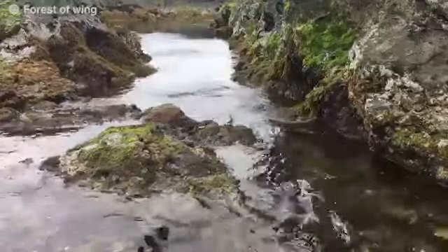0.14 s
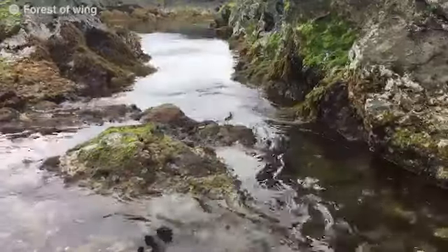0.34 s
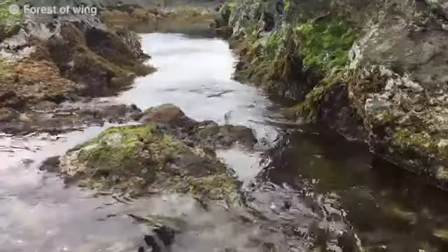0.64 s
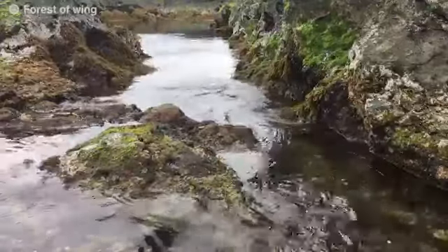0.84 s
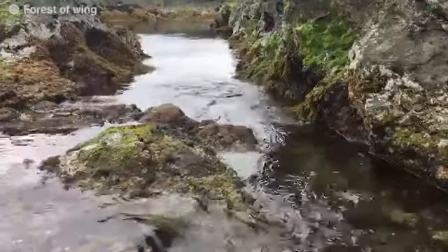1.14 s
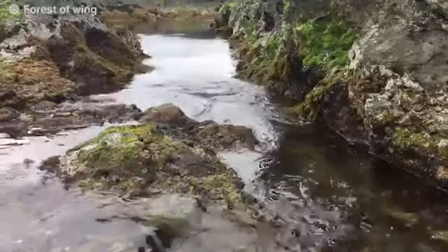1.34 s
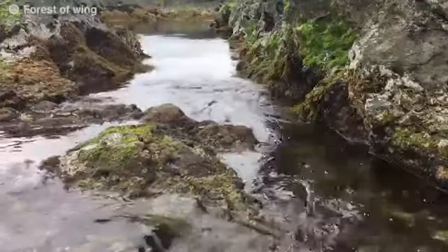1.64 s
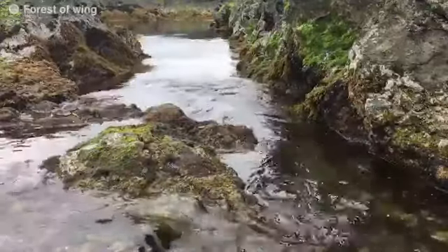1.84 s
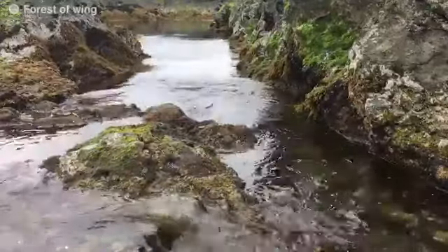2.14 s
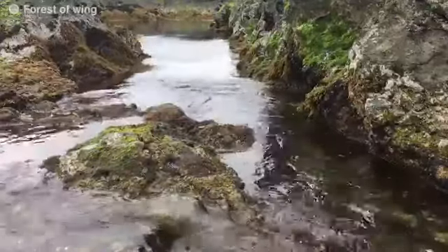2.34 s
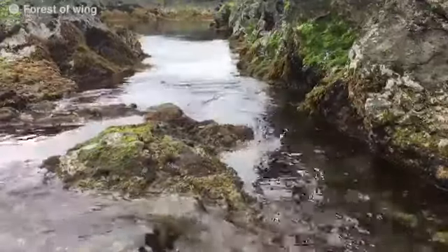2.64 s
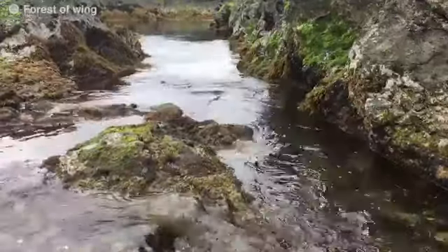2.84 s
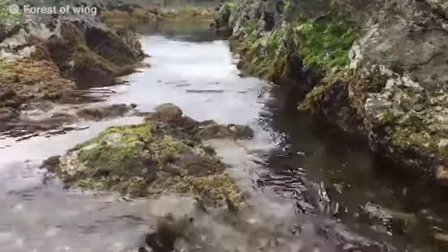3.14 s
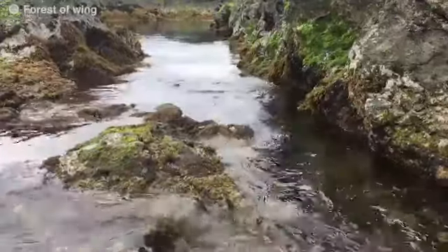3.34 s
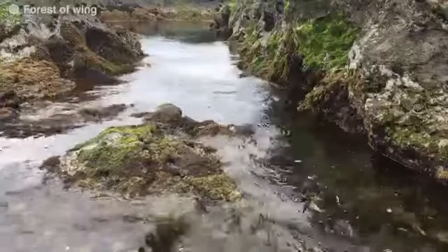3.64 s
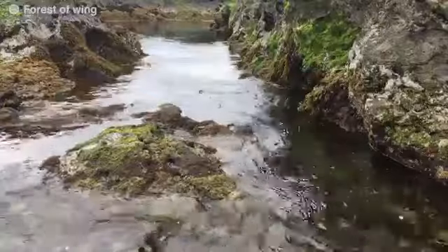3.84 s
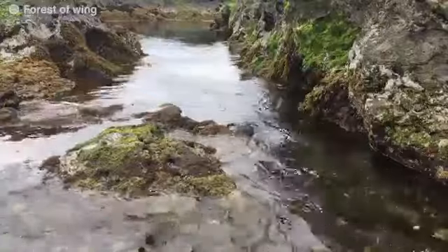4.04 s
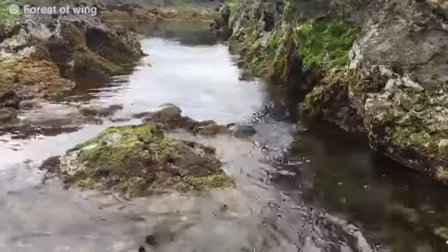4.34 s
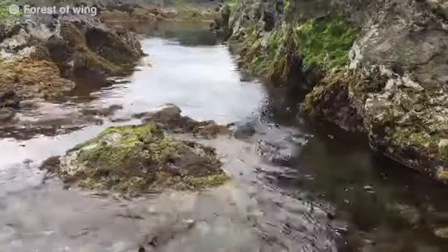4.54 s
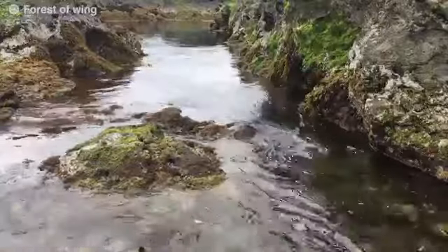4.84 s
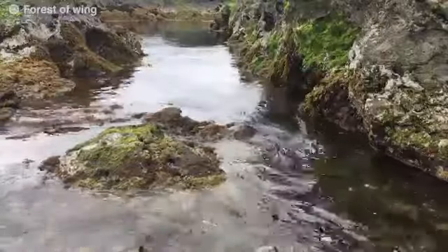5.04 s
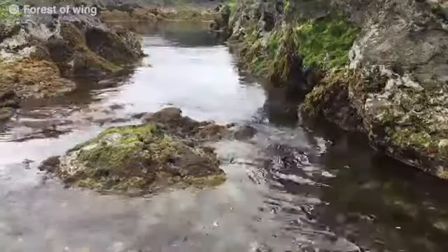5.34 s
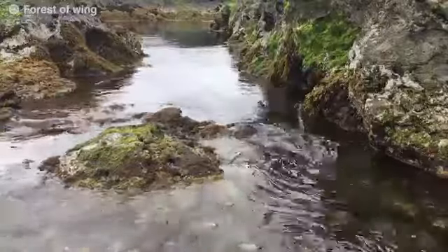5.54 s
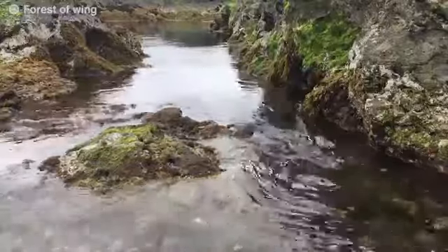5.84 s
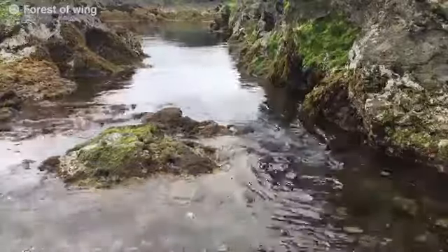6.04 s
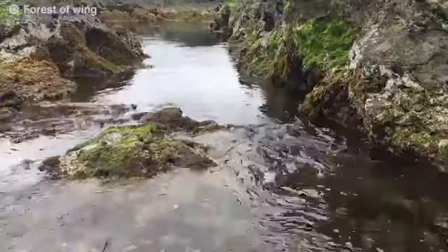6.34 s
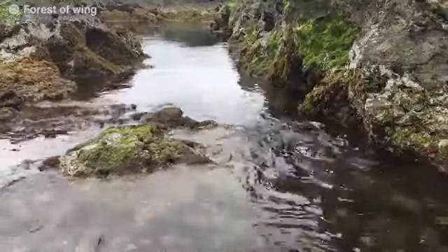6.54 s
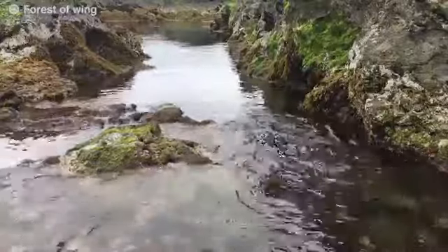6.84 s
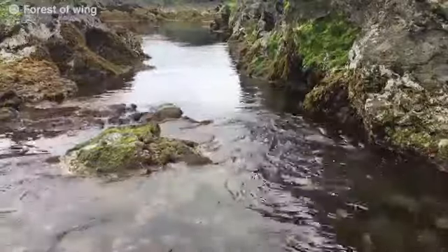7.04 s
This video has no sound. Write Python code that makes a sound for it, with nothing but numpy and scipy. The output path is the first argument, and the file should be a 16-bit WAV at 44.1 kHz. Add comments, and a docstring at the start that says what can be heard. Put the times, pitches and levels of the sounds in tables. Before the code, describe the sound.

A low swell bubbles close by between shore rocks, foam ticking and hissing, wind buffeting the microphone, then draining glugs fade to calm.

```python
"""Swell in a rocky gap

A low swell pushes seawater through a gap between shore rocks, close to the microphone.
Trapped air rings as decaying sines that gurgle, foam bursts in tiny resonant ticks, shaped noise
washes and hisses, and the rock walls throw the bubbles and foam back.
Gusts of low-passed noise and swings of pressure buffet the microphone twice; two engines, probably
on boats, drone far off as wavering harmonics over a dull rumble and the hiss of the open sea."""
import sys
import numpy as np
from scipy import signal
from scipy.fft import rfft, irfft, next_fast_len
from scipy.io import wavfile
from scipy.ndimage import uniform_filter1d

SR = 44100
rng = np.random.default_rng(int(sys.argv[2]) if len(sys.argv) > 2 else 0)


def inscribe(sig):
    """Save sig as 16-bit PCM at rate SR to the path in sys.argv[1].

    A 1-D sig is mono; a 2-D sig holds one channel per row.
    Samples are clipped to [-1, 1] before scaling.
    """
    pcm = np.round(np.clip(np.atleast_2d(sig).T, -1, 1) * 32767)
    wavfile.write(sys.argv[1], SR, pcm.astype(np.int16))


N = 317299  # samples
TIME = np.arange(N) / SR  # seconds


def from_db(db):
    """Logarithmic level: decibels to amplitude gain."""
    return 10 ** (np.asarray(db) / 20)


def rms_one(x):
    """Power normalization: scale to rms 1."""
    return x / np.sqrt(np.mean(x ** 2) + 1e-20)


def in_time(rows):
    """Linear interpolation: the columns of a curve table at every sample."""
    s, *columns = np.transpose(rows)
    return np.array([np.interp(TIME, s, column) for column in columns])


def at_hz(points, hz):
    """Logarithmic pitch: read a spectrum in dB on a log-frequency axis."""
    f, db = np.transpose(points)
    return np.interp(np.log(hz + 1e-9), np.log(f), db)


def envelope(start_s, attack_s, hold_s, release_s):
    """Amplitude envelope: rise, hold and fall between 0 and 1."""
    corners_s = start_s + np.cumsum([0, attack_s, hold_s, release_s])
    return np.interp(TIME, corners_s, [0, 1, 1, 0])


def drift(rate_hz):
    """Low-passed chance: a slow random curve with spread 1, from two equal poles at the given rate."""
    step, settle = 40, 2000  # samples per slow step; slow steps dropped while the filter settles
    r = np.exp(-2 * np.pi * rate_hz * step / SR)
    chance = rng.standard_normal(N // step + settle + 2)
    slow = signal.lfilter([1], [1, -2 * r, r * r], chance)[settle:]
    return np.interp(np.arange(N) / step, np.arange(len(slow)), rms_one(slow))


def noise(spectrum):
    """Spectral shaping: white noise weighted to a given colour, rms 1."""
    size = next_fast_len(N)
    hz = np.arange(size // 2 + 1) * SR / size
    white = rfft(rng.standard_normal(size))
    return rms_one(irfft(white * from_db(at_hz(spectrum, hz)), size)[:N])


def low_pass(order, hz):
    """Butterworth low-pass filter: maximally flat below its corner."""
    return signal.butter(order, hz, fs=SR, output="sos")


def high_pass(order, hz):
    """Butterworth high-pass filter: maximally flat above its corner."""
    return signal.butter(order, hz, "high", fs=SR, output="sos")


def resonate(x, hz, width_hz):
    """Damped resonance: a pole pair with gain 1 at its top."""
    r = np.exp(-np.pi * width_hz / SR)
    zeros = np.array([1, 0, -1]) * (1 - r * r) / 2
    poles = [1, -2 * r * np.cos(2 * np.pi * hz / SR), r * r]
    return signal.lfilter(zeros, poles, x + 1e-18)


def steady(x):
    """Running power normalization: hold the half-second rms of a grain stream at 1."""
    return x / np.sqrt(uniform_filter1d(x ** 2, SR // 2) + 1e-12)


def add(out, s, sound):
    """Superposition: mix a short sound in at time s."""
    start = int(np.clip(s * SR, 0, N))
    out[start:start + len(sound)] += sound[:N - start]


def bubble(hz, cycles, rise, swell_cycles=0.2):
    """Bubble resonance: a sine dies by 60 dB in so many cycles; pitch rises as it nears the surface."""
    turn = np.arange(int(cycles / hz * SR) + 2) * hz / SR
    age = turn / cycles
    swell = 1 - np.exp(-(turn / swell_cycles) ** 2)
    decay = np.exp(-np.log(1000) * age)
    return swell * decay * np.sin(2 * np.pi * turn * (1 + rise * age / 2))


def scatter(count, level_db, crowding):
    """Level-weighted chance: random moments in seconds that crowd together where the level is high."""
    due = np.cumsum(from_db(crowding * level_db))
    share = (np.arange(count) + rng.random(count)) / count
    return np.searchsorted(due, share * due[-1]) / SR


def engine(orders, cycle_hz, waver_db=2.0, speed_wander=0.00437):
    """Harmonics of the firing cycle; each wavers on its way through the moving air."""
    turn = 2 * np.pi * np.cumsum(cycle_hz * (1 + speed_wander * drift(0.84))) / SR
    out = np.zeros(N)
    for multiple, db in orders:
        gain = from_db(db + waver_db * drift(3.0))
        out += gain * np.sin(multiple * turn + rng.uniform(0, 2 * np.pi))
    return np.sqrt(2) * out


# Orders of the slow engine. Each row: multiple of the cycle rate, relative level in dB.
SLOW_ORDERS = [(3, -60), (4, -75), (5, -48.5), (6, -63), (9, -51), (10, -52), (11, -65), (12, -57.5),
               (13, -64.5)]
# Orders of the fast engine. Each row: multiple of the cycle rate, relative level in dB.
FAST_ORDERS = [(2, -52), (3, -61), (4, -62.5), (5, -74)]
SLOW_CYCLE_HZ, FAST_CYCLE_HZ = 12.82, 65.7
# The engines come through more strongly for a while, by a bell-shaped curve.
ENGINE_CREST_S, ENGINE_SWELL_S, ENGINE_CREST_DB = 5.1, 0.93, 6.5


def engines(level_db=-7.0):
    """Superposed harmonic series: two engines whose joint level swells to a crest and fades."""
    carry_db = ENGINE_CREST_DB * np.exp(-((TIME - ENGINE_CREST_S) / ENGINE_SWELL_S) ** 2)
    both = engine(SLOW_ORDERS, SLOW_CYCLE_HZ) + engine(FAST_ORDERS, FAST_CYCLE_HZ)
    return from_db(carry_db + level_db) * both


# Level of the low rumble, which swells with the breeze. Each row: time in seconds, level in dB.
RUMBLE_SWELL = [(0, -40.5), (.33, -43), (.42, -44), (1.2, -42.5), (2.0, -45.5), (2.15, -38), (2.5, -44.5),
                (2.65, -29.5), (2.8, -39.5), (3.2, -35.5), (3.55, -42), (4.1, -49.5), (5.1, -43.5),
                (6.15, -40), (6.5, -41.5), (6.75, -35), (7.0, -41), (7.19, -43)]
# Colour of the rumble. Each row: frequency in Hz, relative density in dB per Hz.
RUMBLE_SPECTRUM = [(20, 2), (40, -7), (70, 1.5), (100, -9), (150, -18), (220, -22.5), (320, -31.5),
                   (600, -41.5), (900, -47), (1600, -60.5)]


def rumble(swell_db=3.0, heave_hz=130):
    """Band-split modulation: dull noise whose deepest part heaves."""
    level_db, = in_time(RUMBLE_SWELL)
    even = noise(RUMBLE_SPECTRUM)
    deep = signal.sosfiltfilt(low_pass(2, heave_hz), even)
    heaving = from_db(swell_db * drift(2.3)) * deep
    return from_db(level_db) * (even - deep + heaving)


# Colour of the open sea. Each row: frequency in Hz, relative density in dB per Hz.
SEA_SPECTRUM = [(240, -10.5), (400, -2), (738, -11), (3160, -18), (4920, -26), (6000, -22.5),
                (14400, -18.5), (15500, -79)]


def open_sea(level_db=-71):
    """Stationary broadband noise: the steady hiss of the open sea."""
    return from_db(level_db) * noise(SEA_SPECTRUM)


# Puffs of wind on the microphone. Each row: start in seconds, length in seconds from the start to
# the fall, level in dB before its low-pass, corner of that low-pass in Hz.
WIND_PUFFS = [(2.084, 0.1, -42.5, 400), (2.228, 0.057, -42, 496), (2.316, 0.029, -36, 805),
              (2.423, 0.047, -40.5, 400), (2.589, 0.058, -36, 190), (2.667, 0.055, -37.5, 603),
              (2.816, 0.058, -36.5, 262), (2.891, 0.081, -33, 420), (3.132, 0.042, -33.5, 500),
              (3.214, 0.18, -36.5, 446), (6.722, 0.12, -40.5, 258), (7.113, 0.07, -33.5, 445)]
# Colour of the turbulence. Each row: frequency in Hz, relative density in dB per Hz.
WIND_SPECTRUM = [(30, 8), (80, -3.5), (160, 1), (300, -6.5), (750, -30), (1300, -58)]
GUST_ATTACK_S, GUST_RELEASE_S = 0.016, 0.011


def puffs(flutter_db=4.0):
    """Turbulent pressure fluctuation: fluttering noise in puffs, each with its own brightness."""
    turbulence = noise(WIND_SPECTRUM) * from_db(flutter_db * drift(58))
    out = np.zeros(N)
    for s, length_s, db, top_hz in WIND_PUFFS:
        shape = envelope(s, GUST_ATTACK_S, length_s - GUST_ATTACK_S, GUST_RELEASE_S)
        out += from_db(db) * shape * signal.sosfilt(low_pass(2, top_hz), turbulence)
    return out


# The sharpest eddies hitting the microphone. Each row: start in seconds, relative level in dB,
# time from the start to the crest of the envelope in seconds.
SHARP_EDDIES = [(2.113, -27.5, 0.014), (2.142, -34, 0.01), (2.249, -41, 0.0053), (2.33, -35, 0.0082),
                (2.689, -33.5, 0.0091), (2.826, -27, 0.011), (2.918, -31, 0.0062), (2.993, -38, 0.0079),
                (3.118, -19.5, 0.01), (3.158, -34, 0.0046), (3.232, -28, 0.0063), (3.265, -35, 0.0054),
                (3.289, -24, 0.0074), (3.296, -21, 0.00205), (3.789, -38, 0.0089), (6.81, -36, 0.0059),
                (7.153, -32.5, 0.0053), (7.172, -36, 0.0044)]


def eddies(level_db=2.5, top_hz=750, turns=1.064):
    """Vortex passage: a sharp eddy is a swing of pressure that slows as it passes."""
    out = np.zeros(N)
    for s, db, swing_s in SHARP_EDDIES:
        age = TIME[1:SR // 10] / swing_s
        shape = (age * np.exp(1 - age)) ** 2
        swing = np.sin(2 * np.pi * turns * np.log(age))  # log phase: the swing slows with age
        add(out, s, from_db(db + level_db) * shape * swing)
    return signal.sosfilt(low_pass(4, top_hz), out)


# Colour of the churning current. Each row: frequency in Hz, relative density in dB per Hz.
WASH_SPECTRUM = [(240, 6), (400, -7), (570, 6.5), (765, -13), (1420, -1.5), (1880, -10.5), (4500, -17.5),
                 (5850, -85)]
# Colour of the fine hiss. Each row: frequency in Hz, relative density in dB per Hz.
HISS_SPECTRUM = [(2350, -44), (4000, -32), (6020, -18), (7720, -12), (9200, -46), (12100, 29), (14400, 7),
                 (15500, 30)]


def wash(gurgle_db, fizz_db, churn_db=5.0, wash_db=-2.5, hiss_db=-3.0):
    """Amplitude-modulated noise: the current's wash and its hiss churn together."""
    current = from_db(gurgle_db + wash_db) * noise(WASH_SPECTRUM)
    hiss = from_db(fizz_db + hiss_db) * noise(HISS_SPECTRUM)
    return from_db(churn_db * drift(38)) * (current + hiss)


# Resonances of a hollow in the rock. Each row: frequency in Hz, nominal width in Hz, relative level in dB.
HOLLOW_MODES = [(348, 175, 4.5), (540, 130, -1), (880, 175, 3.5), (1400, 74, -5), (2050, 340, -2.5)]
DRAIN_START_S, DRAIN_RISE_S, DRAIN_HOLD_S, DRAIN_FALL_S = 3.6, 0.58, 1.4, 0.96


def drain(count, glug_db=-58.5, spread_db=2.0, cycles=22, rise=0.18, rush_db=-73.0):
    """Cavity resonance: backwash rushes through a hollow; trapped air burbles near its resonances."""
    draining = envelope(DRAIN_START_S, DRAIN_RISE_S, DRAIN_HOLD_S, DRAIN_FALL_S)
    draining_db = 20 * np.log10(draining + 1e-9)
    stream = rng.standard_normal(N)
    rush, glugs = np.zeros(N), np.zeros(N)
    for hz, width_hz, db in HOLLOW_MODES:
        mode = resonate(resonate(stream, hz, 2 * width_hz), hz, 2 * width_hz)
        rush += from_db(db) * rms_one(mode)
        moments = scatter(count, draining_db, crowding=0.98)
        for s, (size, detune) in zip(moments, rng.random((count, 2))):
            level_db = glug_db + db - spread_db * np.log(size + 0.13)
            glug_hz = hz + width_hz * (2 * detune - 1)
            add(glugs, s, from_db(level_db) * bubble(glug_hz, cycles, rise))
    return draining * (from_db(rush_db) * rms_one(rush) + glugs)


# Strength of foam ticks by pitch. Each row: frequency in Hz, relative level in dB.
FOAM_STRENGTH = [(3500, -20), (5000, 2.5), (7500, -2), (9500, 6.5), (12500, 3.5), (15000, 1)]


def foam(count, per_s=1100, spread_db=9.0, sharpness=3.6, clump_db=4.0):
    """Impulse excitation: tiny bubbles burst in clumps, each at one of many pitches."""
    born = rng.random(N) < per_s * from_db(clump_db * drift(14)) / SR
    strength = from_db(-spread_db * np.log(rng.random(N) + .03))
    clicks = born * strength * rng.choice([-1, 1], N)
    dealt = rng.integers(0, count, N)  # which pitch each click excites
    out = np.zeros(N)
    for k, hz in enumerate(np.geomspace(4000, 14800, count)):
        width_hz = hz / sharpness
        ring = resonate(resonate(clicks * (dealt == k), hz, width_hz), hz, width_hz)
        out += from_db(at_hz(FOAM_STRENGTH, hz)) * ring / np.sqrt(hz)
    return steady(rms_one(out))


# The loudest droplets. Each row: time in seconds, relative level in dB, pitch in Hz.
DROPLETS = [(0.973, -39, 8600), (1.2266, -35, 5600), (1.4057, -29.5, 10800), (1.9781, -51, 6400),
            (2.5817, -37, 8200), (2.6638, -27.5, 10900), (2.7794, -27.5, 14600), (3.3727, -29, 12820),
            (3.7334, -24.5, 12300), (3.8334, -32.5, 9000), (3.9997, -35, 13300), (4.2982, -35, 10000),
            (4.5416, -25.5, 13100), (4.7165, -33, 11400), (4.807, -34.5, 6700), (5.3324, -42, 10300),
            (5.8224, -36, 10200), (6.7138, -43, 13700)]


def ticks(cycles=14, level_db=4, ring_db=-16, ring_hz=5600, low_cut_hz=3500):
    """Small-source radiation: a water film snaps and its cavity rings, too small for low notes."""
    out = np.zeros(N)
    for (s, db, hz), size in zip(DROPLETS, rng.uniform(0.55, 0.97, len(DROPLETS))):
        snap = bubble(hz, cycles, rise=0, swell_cycles=0.063)
        ring = bubble(ring_hz * size, 35.0, rise=0.11)
        add(out, s + 0.00106, from_db(db + level_db) * snap)
        add(out, s + 0.001056, from_db(db + ring_db) * ring)
    return signal.sosfilt(high_pass(2, low_cut_hz), out)


# Runs of bubbles from an air pocket. Each row: start in seconds, length in seconds, first pitch in Hz,
# last pitch in Hz, relative level in dB.
BUBBLE_RUNS = [(1.235, 0.086, 2570, 3500, -57), (1.506, 0.04, 1800, 1310, -63),
               (1.569, 0.065, 1560, 2500, -63), (1.936, 0.071, 1230, 2200, -59),
               (2.283, 0.045, 1080, 1400, -55), (2.34, 0.032, 3300, 1530, -56),
               (3.067, 0.058, 2360, 3350, -71), (3.358, 0.045, 2630, 3280, -60),
               (3.689, 0.1, 1900, 880, -58), (3.836, 0.03, 4120, 3280, -59), (3.839, 0.034, 1310, 880, -64),
               (3.896, 0.038, 2480, 1400, -54.5), (3.942, 0.036, 1760, 3260, -58.5),
               (4.824, 0.075, 1180, 1500, -63), (5.667, 0.12, 2970, 2030, -63.5),
               (5.881, 0.066, 710, 1900, -64)]


def runs(count, cycles=48, level_db=9.5, scatter_octaves=0.14, rise=0.51):
    """Successive bubble resonance: an air pocket sheds bubbles, each roughly the size of the last."""
    out = np.zeros(N)
    for s, length_s, first_hz, last_hz, db in BUBBLE_RUNS:
        for along in (np.arange(count) + rng.random(count)) / count:
            glide_hz = first_hz + along * (last_hz - first_hz)
            hz = glide_hz * 2 ** (scatter_octaves * rng.standard_normal())
            gain = from_db(db + level_db) * rng.uniform(0.15, 1)
            ring = bubble(hz, cycles, rise * rng.random(), swell_cycles=0.33)
            add(out, s + along * length_s, gain * ring)
    return out


# Wavelets slapping into hollows of the rock. Each row: time in seconds, relative level in dB,
# pitch of the deepest bubble in Hz, relative level of the shower of small bubbles in dB.
ROCK_SLAPS = [(0.047, -47, 1135, -48.5), (2.926, -32, 880, -45.5), (2.957, -39, 850, -45.5),
              (4.2294, -31.5, 993, -39.5), (4.322, -33, 1470, -51.5), (4.5357, -39, 900, -43.5),
              (4.5763, -34.5, 880, -48), (5.0905, -32.5, 624, -50.5), (5.335, -43.5, 1400, -50.5),
              (5.549, -44, 2280, -44)]


def slaps(count, cycles=21, shower_s=0.015, pitch_span=3.8, top_hz=5000, fade_db=7, lead_db=-9, lead_s=0.011):
    """Air-pocket resonance: a wavelet gurgles in and closes on air, which rings and breaks up."""
    out = np.zeros(N)
    for s, db, hz, shower_db in ROCK_SLAPS:
        add(out, s, from_db(db) * bubble(hz, cycles, rise=0.04, swell_cycles=0.071))
        pitches = np.geomspace(hz, min(hz * pitch_span, top_hz), count)
        for (late, early), small_hz in zip(rng.random((count, 2)), pitches):
            small = bubble(small_hz, cycles, rise=0.12)
            add(out, s - lead_s * early, from_db(shower_db + lead_db) * small)
            add(out, s + shower_s * late ** 2, from_db(shower_db - fade_db * late) * small)
    return out


# The loudest single bubbles. Each row: time in seconds, relative level in dB, pitch in Hz.
SINGLE_BUBBLES = [(0.266, -57.5, 2680), (0.557, -64.5, 2770), (0.855, -60.5, 3560), (1.029, -58.5, 3360),
                  (1.134, -50.5, 2930), (1.373, -55.5, 1455), (1.437, -55.5, 3700), (1.496, -50.5, 2030),
                  (1.519, -54.5, 1250), (1.743, -55.5, 2920), (1.777, -42.5, 4230), (1.797, -45.5, 2640),
                  (1.891, -53.5, 1340), (1.901, -53.5, 2040), (2.221, -53.5, 1286), (2.31, -53.5, 1310),
                  (2.323, -49.5, 2740), (2.353, -56, 1660), (2.421, -61.5, 975), (2.428, -46.5, 3710),
                  (2.53, -52.5, 1650), (2.576, -53.5, 1370), (3.098, -56, 1580), (3.189, -57, 1830),
                  (3.269, -49.5, 1900), (3.402, -51, 579), (3.518, -53, 2050), (3.579, -51, 2570),
                  (3.681, -55.5, 2000), (3.749, -50, 4300), (3.788, -62, 780), (3.849, -56, 730),
                  (3.91, -55, 1710), (3.924, -55.5, 932), (4.197, -47, 2700), (4.244, -47, 1425),
                  (4.357, -52.5, 1830), (4.79, -58, 930), (4.839, -55, 1400), (4.938, -61, 880),
                  (4.981, -55, 680), (5.06, -59, 660), (5.19, -60, 1560), (5.272, -61, 1490),
                  (5.462, -52, 2285), (5.986, -57.5, 954), (6.098, -57.5, 650)]


def plops(cycles=54, rise=0.213, level_db=7.5, twin_db=-11, twin_s=0.02):
    """Bubble pinch-off: large bubbles ring one by one, each trailed by a weaker twin of like size."""
    out = np.zeros(N)
    chances = rng.random((len(SINGLE_BUBBLES), 4))
    for (s, db, hz), (life, climb, late, size) in zip(SINGLE_BUBBLES, chances):
        lifetime = cycles * (.5 + life)
        twin_hz = hz * (1 + (size - .5) / 2)
        add(out, s, from_db(db + level_db) * bubble(hz, lifetime, 2 * rise * climb))
        add(out, s + twin_s * (.5 + late), from_db(db + twin_db) * bubble(twin_hz, lifetime, rise))
    return out


# Strength of bubbles by pitch. Each row: frequency in Hz, relative level in dB.
BUBBLE_STRENGTH = [(450, -6), (950, 9), (1500, 7.5), (2700, 13), (5000, 12.5)]


def gurgle(count, flow_db, cycles=64, rise=0.365, spread_db=7.0, low_hz=430, high_hz=5600, deepen=0.071,
           calm_db=-78.0, size=4, clump_s=0.026, clump_octaves=0.362):
    """Air entrainment: ripples trap clumps of like bubbles; strong flow traps more, and the big, deep ones."""
    out = np.zeros(N)
    slack_db = flow_db.max() - flow_db
    trapped = np.cumsum(np.maximum(from_db(flow_db) - from_db(calm_db), 0))  # calm water traps no air
    for k, (when, pitch, strength) in enumerate(rng.random((count, 3))):
        born = np.searchsorted(trapped, (k + when) / count * trapped[-1])
        deepest_hz = low_hz * (1 + deepen * slack_db[born])
        clump_hz = deepest_hz * (high_hz / deepest_hz) ** np.sqrt(pitch * (1 + pitch) / 2)
        level_db = at_hz(BUBBLE_STRENGTH, clump_hz) - spread_db * np.log(strength + 0.04)
        for late, detune, share, life, climb in rng.random((size, 5)):
            hz = clump_hz * 2 ** (clump_octaves * (2 * detune - 1))
            ring = bubble(hz, cycles * (.5 + life), 2 * rise * climb, swell_cycles=1.0)
            add(out, born / SR + clump_s * (late - .5), from_db(level_db) * share * ring)
    return rms_one(out)


def rock_walls(x, t60=0.044, wet_db=-8, first_s=0.0013):
    """Diffuse reflection: rough rock close by scatters a short, exponentially decaying tail."""
    t = TIME[:SR // 5]
    tail = rng.standard_normal(len(t)) * from_db(-60 * t / t60) * (t > first_s)
    echo = signal.fftconvolve(x, tail / np.linalg.norm(tail))[:N]
    return x + from_db(wet_db) * echo


# Water running through the gap. Each row: time in seconds, gurgle level in dB and fizz level in dB,
# both before random surges and layer gains.
GAP_FLOW = [(0.0, -75.5, -77), (0.82, -75.5, -73), (1.36, -70.5, -65), (1.64, -73, -70), (1.88, -68, -67.5),
            (2.26, -68, -65), (2.46, -63, -65), (2.68, -63.5, -67.5), (3.04, -62.5, -64), (3.8, -63, -65),
            (4.1, -68, -69.5), (4.64, -70.5, -65.5), (5.17, -72, -69), (5.63, -68, -69.5),
            (6.17, -78.5, -74.5), (7.19, -79, -72.5)]


def water(foam_growth=0.38, surge_db=1.0, bubbles_db=-2.5, froth_db=4.5):
    """Flow-driven superposition: bubbles and foam ring over the wash; calm water makes little foam."""
    gurgle_db, fizz_db = in_time(GAP_FLOW) + surge_db * drift(4)
    bubbles = from_db(gurgle_db + bubbles_db) * gurgle(count=1050, flow_db=gurgle_db)
    foam_db = fizz_db + foam_growth * (fizz_db - fizz_db.max()) + froth_db
    froth = from_db(foam_db) * foam(count=18)
    singles = plops() + ticks()
    pockets = runs(count=10) + slaps(count=10) + drain(count=30)
    return rock_walls(bubbles + froth + singles + pockets) + wash(gurgle_db, fizz_db)


def scene():
    """Linear superposition: engines, rumble and open sea behind, wind on the microphone, water in front."""
    distance = engines() + rumble() + open_sea()
    wind = puffs() + eddies()
    return (distance + wind + water())[None]


# Dips of the microphone port. Each row: frequency in Hz, width in Hz, depth in dB.
PORT_NOTCHES = [(4930, 900, -5.5), (7600, 550, -3.5), (10490, 470, -26)]
CUTOFF_HZ = 15200


def record(dry, low_cut_hz=35):
    """Transducer response: the microphone thins deep bass, its port carves treble dips, the top is cut."""
    dry = signal.sosfilt(high_pass(3, low_cut_hz), dry)
    for hz, width_hz, depth_db in PORT_NOTCHES:
        dry = dry - (1 - from_db(depth_db)) * resonate(dry, hz, width_hz)
    return signal.sosfilt(signal.ellip(10, .3, 80, CUTOFF_HZ, fs=SR, output="sos"), dry)


dry = scene()
out = record(dry)
inscribe(out)
```